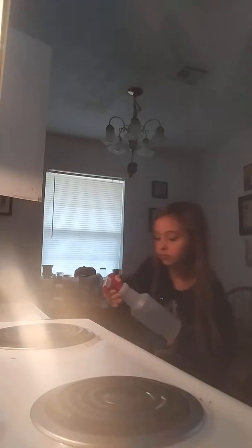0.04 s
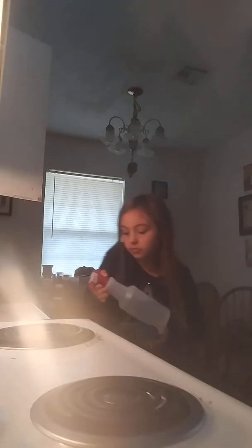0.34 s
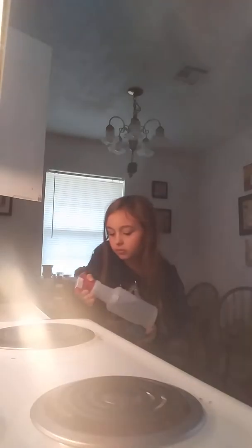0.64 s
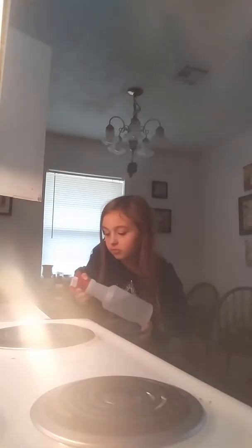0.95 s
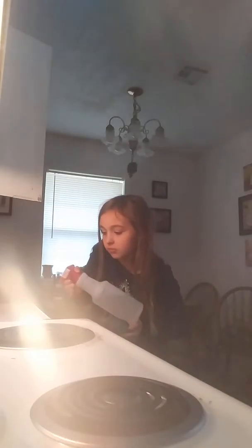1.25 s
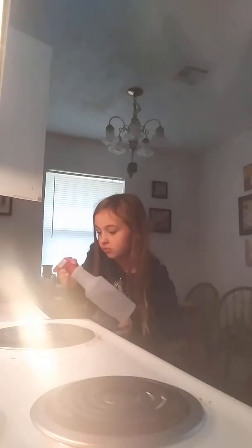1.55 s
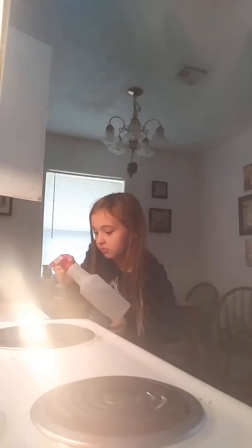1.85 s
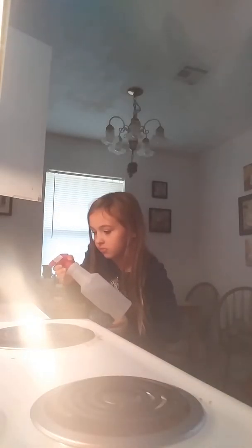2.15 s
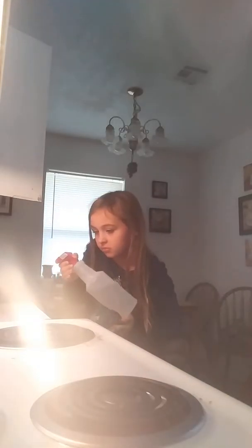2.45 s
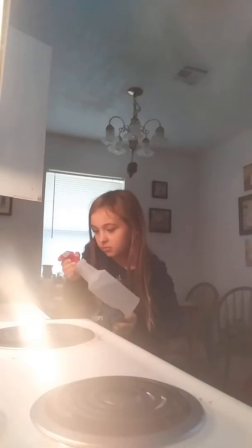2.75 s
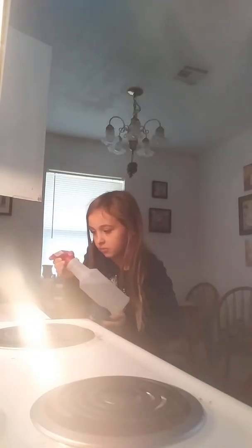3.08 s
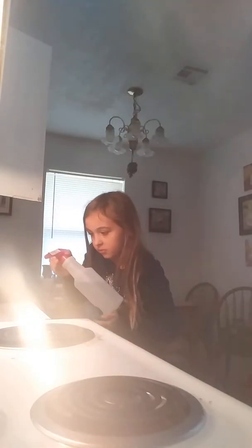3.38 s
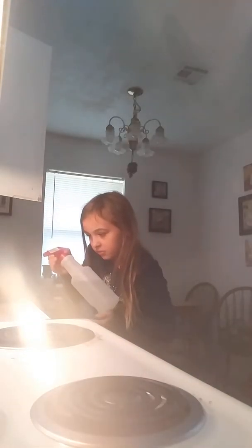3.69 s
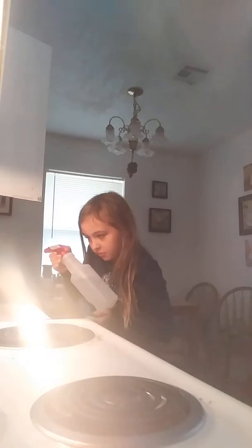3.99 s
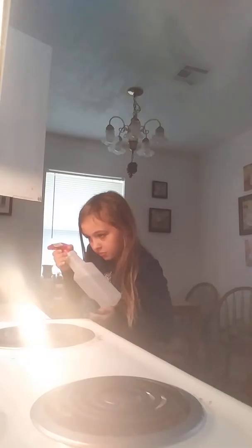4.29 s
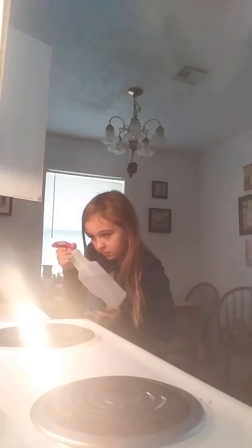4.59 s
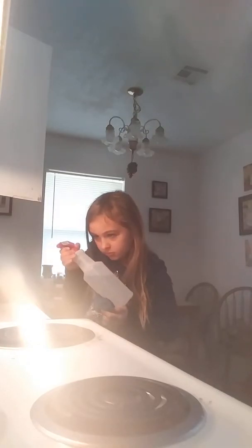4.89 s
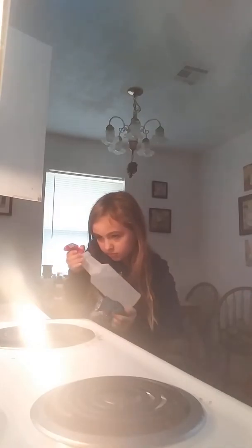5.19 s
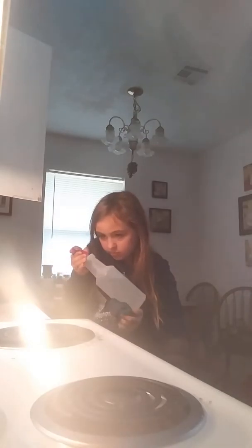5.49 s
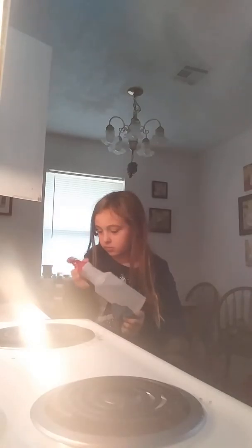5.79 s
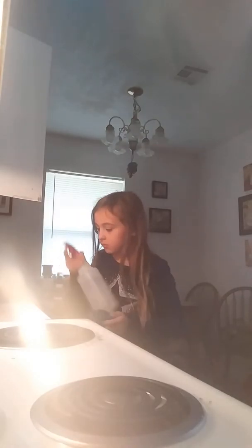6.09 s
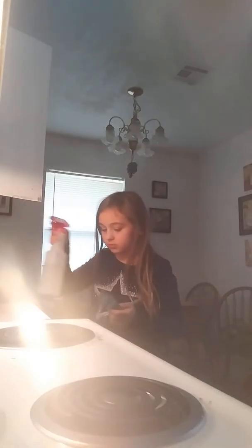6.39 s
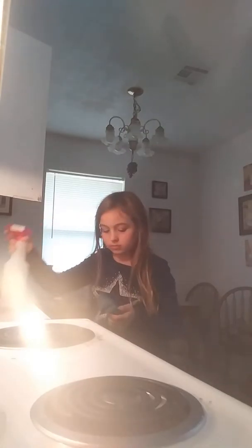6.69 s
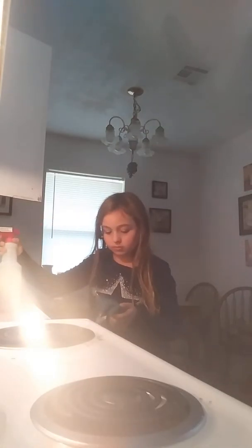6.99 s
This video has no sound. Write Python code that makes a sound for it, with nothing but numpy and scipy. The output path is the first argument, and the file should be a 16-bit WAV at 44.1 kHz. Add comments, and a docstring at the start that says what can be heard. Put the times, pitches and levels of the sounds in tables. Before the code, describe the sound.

A trigger spray bottle is pumped in a hard-surfaced kitchen with a short echo. It opens with soft puffs of mist, then from about 0.3 to 2.7 seconds squirts roughly three times a second. Each squeeze spits with a small falling gulp and opens into a brief hiss; the trigger springs back with a bubbly slurp and a plastic click. After a short pause, spraying resumes at about 3.1 seconds, a little slower, with stronger spits, generally lighter mist and small gurgles. It ends with the sharpest click at about 5.4 seconds. From 5.7 to 6.6 seconds fingers rub and squeak faintly on the plastic. At about 6.7 seconds the bottle lands on the counter with a loud, briefly ringing thud, followed by a light slide until 7 seconds. The small microphone gives thin lows, a dull top and a faint steady hiss.

```python
"""In a kitchen, a trigger spray bottle is pumped again and again, then stood on the counter.
Each squeeze spits from the nozzle with a falling gulp and opens into a hiss of mist; the trigger
springs back with a slurp of bubbles and a plastic click. Fingers rub and squeak on the bottle, and
its base lands with a ringing thud. The hard room rings on, over a faint steady hiss."""
import sys
import numpy as np
from scipy import signal
from scipy.fft import rfft, irfft
from scipy.io import wavfile

SR = 44100
rng = np.random.default_rng(int(sys.argv[2]) if len(sys.argv) > 2 else 0)


def put_to_file(sound):
    """Save the sound as 16-bit audio at rate SR, in the file named by the first command-line argument."""
    columns = np.atleast_2d(sound).T  # one column per channel
    safe = np.clip(columns, -1, 1)
    whole_steps = np.round(safe * 32767)
    wavfile.write(sys.argv[1], SR, whole_steps.astype(np.int16))


N = 310403


def amp(db):
    """Decibels to gain."""
    return 10 ** (np.asarray(db) / 20)


def unit(x):
    """Scales to rms 1."""
    return x / np.sqrt(np.mean(x ** 2) + 1e-20)


def curve_at(points, hz):
    """Reads a curve on a log-frequency axis."""
    point_hz, value = np.transpose(points)
    return np.interp(np.log(hz + 1), np.log(point_hz + 1), value)


def add(mix, start_s, sound):
    """Mixes a sound in; a negative start means it is already under way."""
    at = round(start_s * SR)
    part, sound = mix[max(at, 0):], sound[max(-at, 0):]
    part[:len(sound)] += sound[:len(part)]


def cut(x, hz, kind):
    """Steep high-pass or low-pass."""
    return signal.sosfilt(signal.butter(4, hz, kind, fs=SR, output="sos"), x)


def colour(x, eq, size=4096):
    """Minimum-phase EQ along the given curve."""
    log_gain = np.log(amp(curve_at(eq, abs(np.fft.fftfreq(size, 1 / SR)))))
    taps = np.fft.ifft(np.exp(np.conj(signal.hilbert(log_gain)))).real
    return signal.fftconvolve(x, taps[:size // 2])[:len(x)]


def resonate(x, hz, width_hz, passes=1):
    """A resonance that can follow a moving pitch; more passes steepen its skirts."""
    turn = np.exp(2j * np.pi * np.cumsum(hz * np.ones(len(x))) / SR)
    pole = np.exp(-np.pi * width_hz / SR)
    for _ in range(passes):
        x = 2 * (turn * signal.lfilter([1 - pole], [1, -pole], x / turn)).real
    return x


def ring(modes, t):
    """Dying modes after one blow."""
    return sum(amp(db - 60 * t / t60) * np.sin(2 * np.pi * hz * t) for hz, db, t60 in modes)


def swell(t, rise_s, fall_s):
    """Rounded attack to 1, straight release to 0."""
    return np.sin(np.pi / 2 * np.clip(t / rise_s, 0, 1)) * np.clip(1 - (t - rise_s) / fall_s, 0, 1)


def sputter(t, per_s, spread_db, share):
    """Rushing noise with pops of uneven size, which carry the given share of the power."""
    noise, sign = rng.standard_normal((2, len(t)))
    pops = np.sign(sign) * (rng.random(len(t)) < per_s / SR)
    pops *= amp(spread_db * np.minimum(rng.exponential(1, len(t)), 3))
    return np.sqrt(1 - share) * noise + np.sqrt(share) * unit(pops)


def jet(drive, eq, edge_hz, tilt_db, peak_db, under_db):
    """Shapes noise to be weak below its lowest resonance, edge_hz, and broad above it."""
    hz = np.fft.rfftfreq(len(drive), 1 / SR)
    edge_db = np.interp(hz / edge_hz, [0.45, 0.72, 1, 1.25], [under_db, under_db * 0.96, peak_db, 0.023])
    octaves = np.log2(np.maximum(hz, 500) / 2000)
    gain = amp(curve_at(eq, hz) + edge_db + tilt_db * octaves)
    return unit(irfft(rfft(drive) * gain, len(drive)))


# Tone of the noise floor: freq_hz, gain_db
FLOOR_EQ = [(15, -58), (25, -30), (286, -16), (394, -5.5), (529, -13.5), (729, -5.5), (790, -11),
            (1000, -10.5), (1420, -9.5), (1810, -15), (1960, -15), (6370, -22), (7090, -26.5), (12100, -27),
            (15000, -50)]


def noise_floor():
    """A faint, steady bed of hiss."""
    return amp(-76.5) * unit(colour(rng.standard_normal(N), FLOOR_EQ))


# Reverb time by band: freq_hz, t60_s
ROOM_DECAY = [(150, 0.19), (500, 0.32), (1200, 0.44), (3000, 0.39), (5500, 0.33), (6800, 0.17),
              (14000, 0.1)]
# Early reflections off counter, stove and cupboards: delay_s, gain
EARLY_ECHOES = [(.0021, 0.4), (.0064, 0.26), (0.0126, -0.11), (0.011, 0.071)]


def kitchen(x, wet_db):
    """Direct sound, a few near echoes, and a dense tail that dies at its own speed in each band."""
    count = SR * 3 // 4
    reflections = rng.choice([-1., 1.], count) * (rng.random(count) < 4000 / SR)
    hz, t, bands = signal.stft(reflections, SR, nperseg=256)
    decay = amp(-60 * t / curve_at(ROOM_DECAY, hz)[:, None])
    tail = signal.istft(bands * decay, SR, nperseg=256)[1]
    tail[:round(0.004 * SR)] = 0  # pre-delay
    tail /= np.linalg.norm(tail)
    for delay_s, gain in EARLY_ECHOES:
        add(tail, delay_s, np.array([gain]))
    wet = signal.fftconvolve(x, tail)[:N]
    return (x + amp(wet_db) * wet) / np.hypot(1, amp(wet_db))


# Tiny finger squeaks: start_s, length_s, level_db, pitch_hz
SQUEAK_CUES = [(5.659, .045, -65, 1612), (5.733, .08, -76, 2510), (5.853, .03, -66.5, 4200),
               (5.876, 0.08, -60.5, 394), (5.888, 0.021, -55, 1483), (5.975, 0.086, -59, 2450),
               (6.502, 0.061, -66.5, 2780), (6.544, 0.04, -72, 3500)]


def squeaks():
    """Fingers slip on the plastic and softly excite one narrow resonance."""
    out, t = np.zeros(N), np.arange(SR // 8) / SR
    for start_s, length_s, db, hz in SQUEAK_CUES:
        friction = rng.standard_normal(SR // 4)
        note = unit(resonate(friction, hz, width_hz=0.03 * hz + 40, passes=2))[-len(t):]
        fade = np.sin(np.pi * np.minimum(t / length_s, 1)) ** 2
        add(out, start_s, amp(db + 3.5) * note * fade)
    return out


# Soft handling moves: start_s, length_s, level_db, edge_hz
SWISH_CUES = [(5.712, 0.18, -62.5, 2370), (5.864, 0.42, -59, 3760), (6.012, 0.11, -46.5, 2760),
              (6.808, 0.17, -45.5, 1210), (6.895, 0.14, -48.5, 1140)]
# Tone of the rubbing: freq_hz, gain_db
SWISH_EQ = [(200, -55), (1200, 15.5), (2000, 5), (3000, 1.5), (4500, 2), (6000, -5.5), (8000, -15),
            (15000, -20)]


def swishes():
    """Light rubbing while the bottle is lifted and slid into place."""
    out, t = np.zeros(N), np.arange(SR // 3) / SR
    for start_s, length_s, db, edge_hz in SWISH_CUES:
        rub = jet(rng.standard_normal(len(t)), SWISH_EQ, edge_hz, tilt_db=4, peak_db=4.5, under_db=-10)
        add(out, start_s, amp(db) * rub * swell(t, 0.26 * length_s, 0.74 * length_s))
    return out


# Dull thud of the base: freq_hz, gain_db
THUD_EQ = [(50, -42), (100, -19), (250, -11), (420, 13), (560, 0.5), (820, 8.5), (1050, -6.5), (1500, 8.5),
           (1900, -2), (2800, -3.5), (5300, -15), (8000, -24.5), (15000, -26.5)]
# Ring-out of bottle and counter: pitch_hz, level_db, t60_s
COUNTER_MODES = [(159, -23.5, 0.41), (183, -20, 0.31), (347.5, -8, 0.38), (427, -2.5, 0.32),
                 (845, -2.5, 0.39), (1210, -18, 0.21), (1420, -11, 0.28), (1415, -4.5, 0.31),
                 (1634, -1.5, 0.21), (1640, -4, 0.17), (2050, -6.5, 0.12)]


def set_down(start_s):
    """The base lands, chatters for a moment, and rings the bottle and counter."""
    thud, body, t = np.zeros(N), np.zeros(N), np.arange(SR // 2) / SR
    chatter = unit(colour(sputter(t, per_s=660, spread_db=2.5, share=0.56), THUD_EQ))
    add(thud, start_s, amp(-20.5) * chatter * np.exp(-t / 0.038) * (1 - np.exp(-t / 0.0013)))
    add(body, start_s, amp(-26) * ring(COUNTER_MODES, t) * (1 - np.exp(-t / 0.0043)))
    return cut(kitchen(thud, wet_db=-8) + body, 110, "high")


# The trigger springs back, sucking liquid, and hits its stop: click_s, click_db, slurp_db
RETURN_CUES = [(0.883, -35, -43), (1.1982, -36.5, -64), (1.4916, -37, -48), (1.8095, -34, -40),
               (2.1207, -30.5, -42.5), (2.4136, -32, -47), (2.7306, -29.5, -42), (3.3099, -30.5, -42.5),
               (3.6397, -30, -47), (3.9674, -48, -66), (4.3994, -27, -42), (4.7273, -36, -49),
               (4.7604, -34.5, -41.5), (5.3587, -37.5, -53), (5.386, -20.5, -48)]
# Short, bright ring of the lever: pitch_hz, level_db, t60_s
LEVER_MODES = [(1150, -13, .016), (2150, -7, .007), (2450, 0, .009), (2980, 0, .009), (3600, -8, .006),
               (4700, -7, .006), (5600, -8, .005)]


def trigger():
    """The plastic lever scuffs and then snaps against its stop, a little differently each time."""
    out, t = np.zeros(N), np.arange(SR // 20) / SR
    for click_s, db, _ in RETURN_CUES:
        modes = np.array(LEVER_MODES)
        modes[:, 0] *= 1 + 0.035 * rng.standard_normal(len(modes))
        snap = cut(ring(modes, t), 835, "high")
        crack = cut(rng.standard_normal(len(t)), 1500, "high") * np.exp(-t / 0.0046)
        add(out, click_s + 0.002, amp(db + 4.5) * (snap / abs(snap).max() + amp(-22.5) * crack))
        scuff = unit(colour(sputter(t, per_s=2500, spread_db=10, share=0.13), SPIT_EQ))
        add(out, click_s - 0.004, amp(db - 10.5) * scuff * swell(t, 0.0035, 0.013))
    return out


# Liquid gurgling in the dip tube: start_s, length_s, level_db, pitch_hz
GURGLE_CUES = [(0.304, 0.057, -52.5, 400), (.4, .1, -51, 623), (0.748, 0.046, -41, 1990),
               (0.907, .076, -42.5, 883), (1.225, 0.069, -49.5, 820), (2.408, 0.093, -69, 734),
               (2.736, 0.036, -46, 1006), (3.826, 0.1, -43.5, 1060), (3.967, 0.019, -39.5, 1300),
               (4.022, 0.02, -46, 1340), (4.039, 0.042, -53.5, 710), (4.095, 0.026, -43, 1200),
               (4.346, 0.038, -40.5, 1116), (4.757, .04, -45.5, 915), (4.831, 0.031, -49, 1230),
               (5.043, 0.024, -39.5, 1188), (5.06, 0.043, -47, 884), (5.39, 0.035, -40.5, 905)]


def refill(slurp_lead_s=0.026, slurp_length_s=0.034, slurp_hz=1301):
    """Bubbles pop through the valve as the piston moves, each a short note that rises a little."""
    out, t = np.zeros(N), np.arange(SR // 6) / SR
    slurps = [(click_s - slurp_lead_s, slurp_length_s, db, slurp_hz) for click_s, _, db in RETURN_CUES]
    pluck = np.exp(-t / 0.0076) * (1 - np.exp(-t / 0.00084))
    for start_s, length_s, db, hz in slurps + GURGLE_CUES:
        bubbles = np.zeros(len(t))
        gaps, detunes, sizes = rng.standard_normal((20, 3)).T
        onsets = np.cumsum(0.0065 * amp(4 * gaps))
        for onset_s, detune, size in zip(onsets - onsets[0], detunes, sizes):
            cycles = hz * amp(0.9 * detune) * t * (1 + 3 * t)
            add(bubbles, onset_s, amp(6.4 * size) * np.sin(2 * np.pi * cycles) * pluck)
        bubbles = unit(cut(bubbles, hz * 0.69, "high"))
        froth = sputter(t, per_s=810, spread_db=1, share=0.24)
        fizz = jet(froth, MIST_EQ, hz, tilt_db=-2.5, peak_db=2, under_db=-21.5)
        add(out, start_s, amp(db + 0.5) * (bubbles + amp(-5) * fizz) * swell(t, 0.00073, length_s))
    return out


# Hollow body of the pump head: pitch_hz, width_hz, gain_db
HEAD_RESONANCES = [(1245, 79, 6), (1405, 45, -9.5), (1542, 70, -2), (2460, 130, -12), (2990, 62, -17.5)]


def pump_head(x, tuning=1):
    """The hollow head rings; the size of its air pocket tunes all its resonances together."""
    return sum(amp(db) * resonate(x, hz * tuning, width) for hz, width, db in HEAD_RESONANCES)


def gulp(t, build_s, floor_hz=199, fall_hz=1064):
    """A noisy resonance dives from its opening pitch toward that of the full pump chamber."""
    pitch_hz = floor_hz + fall_hz * np.exp(-2 * t / build_s)
    note = resonate(rng.standard_normal(len(t)), pitch_hz, width_hz=220, passes=2)
    envelope = swell(t, build_s * 1.124, 0.026) * np.minimum(t / build_s, 1) ** 0.78
    return unit(cut(note, 235, "high")) * envelope


# Full squeezes, which spit as pressure builds and then mist:
# start_s, build_s, spit_db, mist_delay_s, mist_length_s, mist_db, edge_hz
STROKE_CUES = [(0.299, 0.065, -52, .003, 0.11, -42.5, 1157), (0.356, 0.07, -45.5, 0.0034, 0.18, -42.5, 614),
               (.678, .058, -46.5, 0.027, 0.15, -42, 1155), (0.984, 0.05, -40, .022, 0.17, -44.5, 1150),
               (1.29, 0.04, -39, 0.042, 0.14, -44, 734), (1.578, 0.025, -42.5, 0.045, .17, -41, 802),
               (1.888, 0.033, -41, 0.045, 0.18, -42, 800), (2.196, 0.032, -40, 0.043, 0.17, -51.5, 1290),
               (2.5, 0.079, -38, 0.031, .17, -43.5, 965), (3.408, 0.037, -39.5, 0.077, .18, -53, 1115),
               (3.716, 0.041, -38, .061, 0.23, -53, 1004), (4.119, 0.025, -39, 0.09, 0.13, -46, 975),
               (4.483, 0.053, -37.5, 0.073, 0.19, -40, 866), (4.851, 0.042, -37.5, 0.087, 0.12, -52, 1210),
               (5.159, 0.04, -37, .075, 0.14, -46.5, 1390)]
# Tone of the spit: freq_hz, gain_db
SPIT_EQ = [(200, -61), (600, -10), (1000, -14.5), (1250, 4.5), (1580, -2), (1900, -10), (2900, -7.5),
           (3800, -19.5), (5000, -19.5), (8000, -26.5), (11000, -19), (15000, -24)]


def nozzle(usual_build_s=0.037, usual_spit_db=-38):
    """Air and liquid spit out in stutters as pressure builds; the head rings and the chamber gulps."""
    out, head, t = np.zeros(N), np.zeros(N), np.arange(SR // 5) / SR
    for start_s, build_s, spit_db, *_ in STROKE_CUES:
        slowness, force_db = build_s / usual_build_s, spit_db - usual_spit_db
        pressure = amp(-4 * np.maximum(1 - t / build_s, 0))
        pressure *= np.exp(-np.maximum(t - build_s, 0) / 0.0039)
        # the valve reopens at uneven intervals, and each spurt dies away
        jitter = unit(cut(rng.standard_normal(len(t)), 60, "low"))
        spurts = np.cumsum(76 * amp(2.5 * jitter)) / SR
        stutter = unit(1 + np.exp(-(spurts % 1) / 0.15))
        drive = sputter(t, per_s=1100, spread_db=6, share=0.54)
        # a quick squeeze pops the valve harder
        pop = 0.47 / slowness * np.sign(drive) * np.exp(-t / 0.0021)
        flow = drive * pressure * stutter + pop
        spit = colour(flow, SPIT_EQ) / np.std(colour(drive, SPIT_EQ))
        # slow or weak squeezes carry more air and fizz more
        fizz = amp(7 + 5 * np.log2(slowness) - 0.4 * force_db) * cut(spit, 6900, "high")
        add(out, start_s, amp(spit_db + 1.3) * (cut(spit, 7800, "low") + fizz))
        add(head, start_s, amp(spit_db + 14) * pump_head(flow, tuning=rng.uniform(0.96, 1.05)))
        add(out, start_s, amp(-47.5 + 2.5 * force_db) * gulp(t, build_s))  # grows faster than the spit
    return kitchen(out, wet_db=-7) + kitchen(head, wet_db=2)


# Gentle pulls that give mist alone: start_s, length_s, level_db, edge_hz
PUFF_CUES = [(-.08, 0.32, -54, 1345), (0.165, 0.2, -43, 640), (3.137, 0.16, -48, 1000)]
# Tone of the spray: freq_hz, gain_db
MIST_EQ = [(150, -19), (500, 13), (1000, 2.5), (1650, 6.5), (1900, 3.5), (2500, 4), (3400, -2), (5000, -6),
           (8000, -16), (15000, -16)]


def mist(usual_edge_hz=1010, usual_db=-48):
    """The fine spray: a hiss grained by droplets, with a wet resonance that sinks through the stroke."""
    out, t = np.zeros(N), np.arange(SR // 3) / SR
    after_spits = [(start_s + delay_s, *spray) for start_s, _, _, delay_s, *spray in STROKE_CUES]
    for start_s, length_s, db, edge_hz in after_spits + PUFF_CUES:
        pressure = swell(t, 0.37 * length_s, 0.63 * length_s)
        tilt_db = 0.88 + 0.5 * np.log2(edge_hz / usual_edge_hz)  # a higher jet is brighter
        droplets = sputter(t, per_s=2500, spread_db=0.5, share=0.59)
        hiss = jet(droplets, MIST_EQ, edge_hz, tilt_db, peak_db=0.5, under_db=-43.5)
        # the finest droplets, and so the top octave, come only at high pressure
        sizzle = amp(3.94 + 0.32 * (db - usual_db)) * pressure ** 0.93
        hiss = cut(hiss, 6050, "low") + sizzle * cut(hiss, 6900, "high")
        drops = sputter(t, per_s=200, spread_db=0.5, share=0.76)
        gurgle_hz = edge_hz * (1.12 - 0.25 * np.minimum(t / length_s, 1))
        gurgle = amp(-10) * unit(resonate(drops, gurgle_hz, width_hz=110, passes=2))
        hollow = amp(-12.5) * unit(pump_head(rng.standard_normal(len(t))))
        flutter_db = 1.1 * unit(cut(rng.standard_normal(len(t)), 88, "low"))
        add(out, start_s, amp(db + 3.5) * (hiss + gurgle + hollow) * pressure * unit(amp(flutter_db)))
    return out


def scene():
    """Spray, pump and handling, mixed in mono in the kitchen."""
    spray = kitchen(mist(), wet_db=-9)
    pump = nozzle() + kitchen(refill(), wet_db=-5) + kitchen(trigger(), wet_db=-5.5)
    handling = kitchen(swishes() + squeaks(), wet_db=-10) + set_down(start_s=6.687)
    return (spray + pump + handling)[None]


# Tone of a small microphone, thin lows and a dull top: freq_hz, gain_db
MIC_EQ = [(40, -19.5), (5700, 0.5), (6500, -9.5), (7000, 0), (7600, -8), (14000, -18), (16000, -23.5)]


def record(dry, band_limit_hz=15900):
    """A small microphone with notched treble, a faint noise floor and a steep band limit."""
    x = colour(dry[0], MIC_EQ)
    for notch_hz, q in [(7130, 4.3), (9530, 49)]:
        x = signal.lfilter(*signal.iirnotch(notch_hz, q, SR), x)
    low_pass = signal.firwin(511, band_limit_hz, window=("kaiser", 9), fs=SR)
    return signal.oaconvolve(x + noise_floor(), low_pass, "same")[None]


dry = scene()
out = record(dry)
put_to_file(out)
```